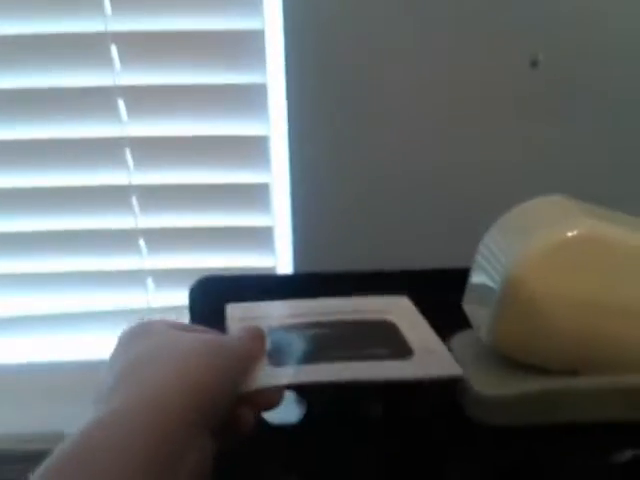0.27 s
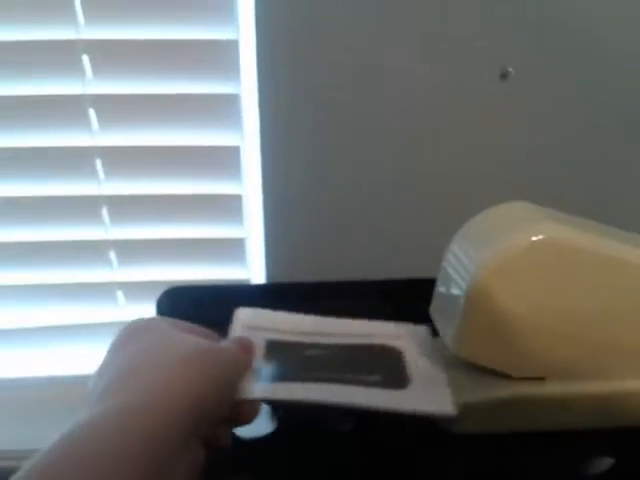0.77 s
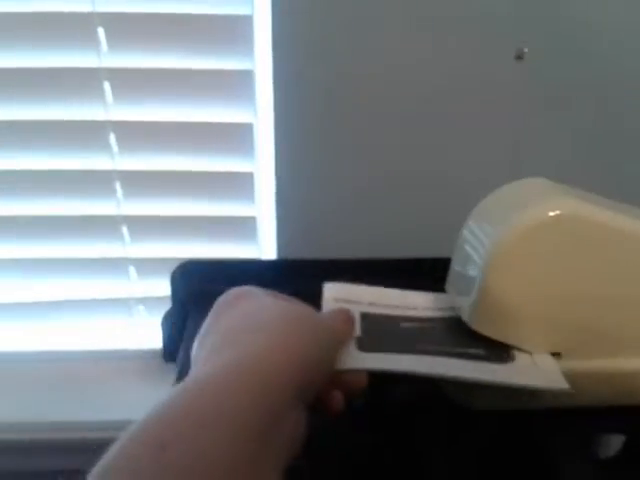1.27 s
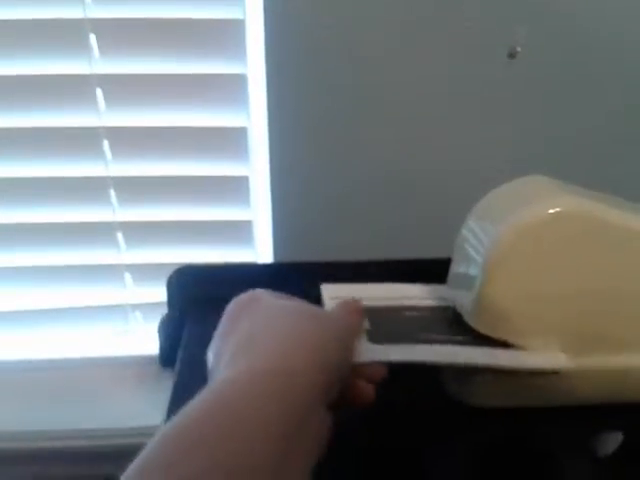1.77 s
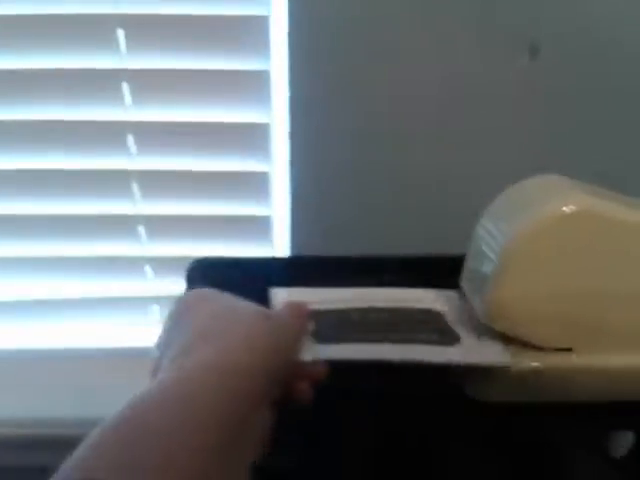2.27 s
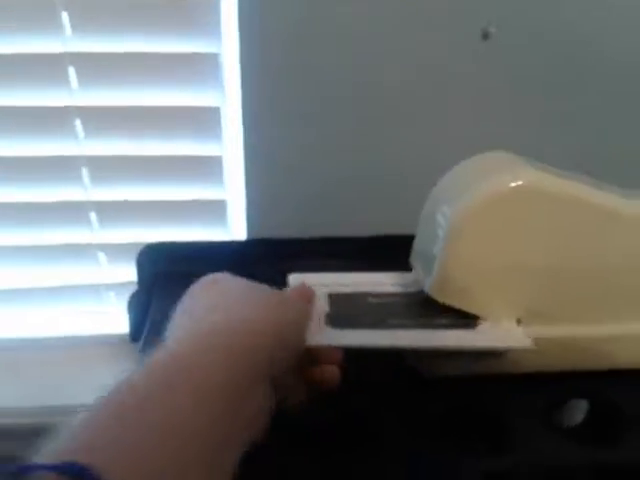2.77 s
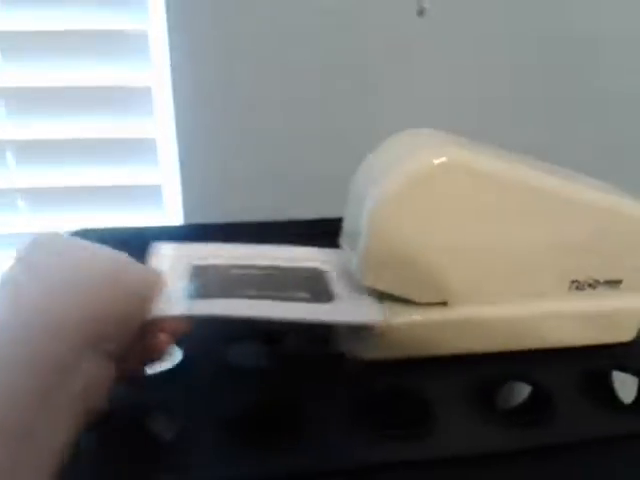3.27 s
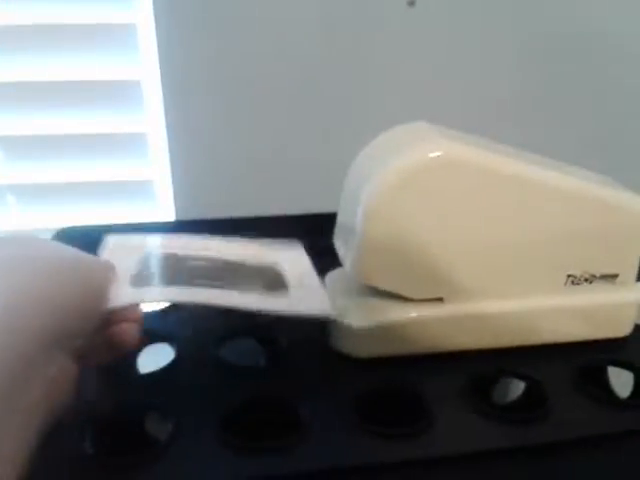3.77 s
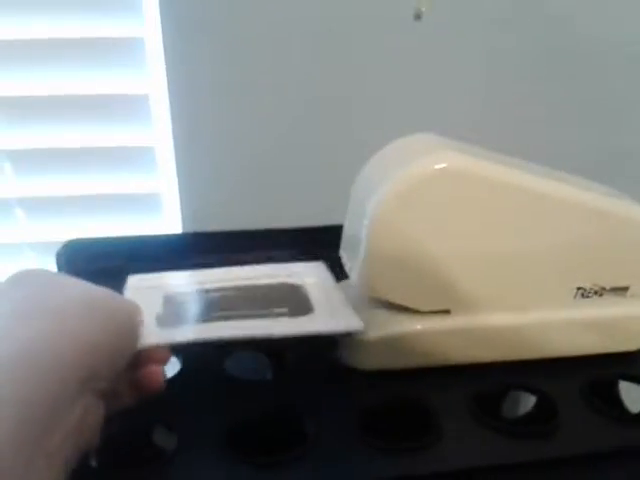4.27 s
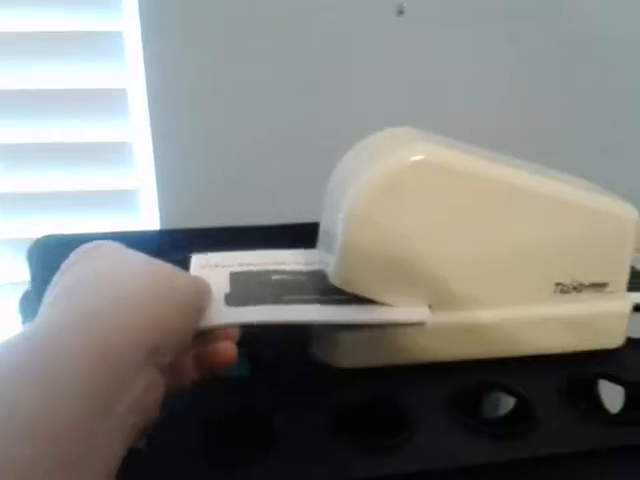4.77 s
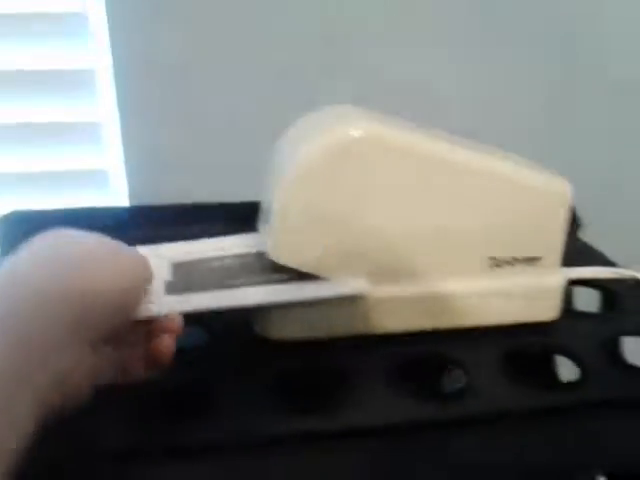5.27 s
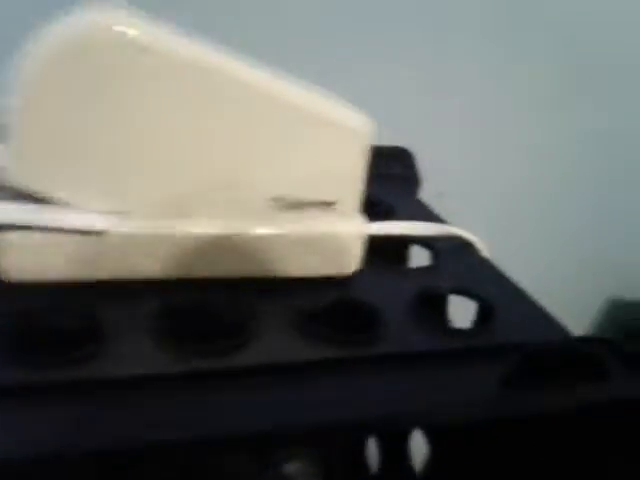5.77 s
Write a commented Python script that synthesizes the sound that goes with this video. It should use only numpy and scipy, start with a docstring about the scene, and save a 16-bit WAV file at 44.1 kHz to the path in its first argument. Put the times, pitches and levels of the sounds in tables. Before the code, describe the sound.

A card taps and slides against a plastic electric stapler, which snaps sharply twice, leaving a brief metal ring in the room.

```python
"""First comes the dying ring of an electric stapler that has just fired, on a plastic cart in a small room.
It fires twice more, each time a fast volley of metal blows that thumps the case on the cart,
sets frame and spring ringing and fills the room. Between firings a card slides in and out of the jaw
and taps against the hollow case. Low rumble and faint hiss lie underneath, and all of it is heard
through a small microphone whose compressor squashes the snaps."""
import sys
import numpy as np
from scipy import signal
from scipy.fft import rfft, irfft
from scipy.io import wavfile
from scipy.ndimage import uniform_filter1d

SR = 44100
rng = np.random.default_rng(int(sys.argv[2]) if len(sys.argv) > 2 else 0)


def pcm_store(signal):
    """Save signal as 16-bit PCM."""
    levels = np.round(np.clip(np.atleast_2d(signal), -1, 1) * 32767)
    wavfile.write(sys.argv[1], SR, levels.astype(np.int16).T)


N = 265041
T = np.arange(N) / SR
RING_T = T[:2 * SR]
LEAD = SR // 4   # samples of scene before time zero

# Stapler firings: start_s, blow_db, hardness_db (on the top treble), thump_db, spring_db, spring_t60_s,
# clinch_delay_s, clinch_db (against the first blow)
FIRINGS = [(-0.132, -5.5, -2.5, -18, -36, 0.95, 0.036, -7.5),
           (1.7821, -5.5, -1, -11.5, -40, 2.0, .027, 1.5), (4.7824, -3, -2, -12.5, -36, 0.9, .011, -1)]
# Tone colour of a metal blow: freq_hz, density_db
BLOW_COLOUR = [(40, -34.5), (130, -23), (350, -9.5), (700, -8), (1050, 3.5), (1650, -5), (2600, -5.5),
               (4000, -3.5), (5300, -4), (6400, 4.5), (7300, 0), (8700, -9.5), (11000, -19.5), (16000, -27)]
# Tone colour of the case thumping on the cart: freq_hz, density_db
THUMP_COLOUR = [(45, -30), (80, -14), (120, -2), (190, -1), (330, -1.5), (550, 1), (1100, 0.5),
                (1800, -16.5)]
# Ringing modes of the metal frame: pitch_hz, level_db, t60_s
FRAME_MODES = [(431, -48, 1.5), (779, -25, .4), (999, -24, .42), (1156, -24, .62), (1345, -27, .5),
               (1470, -41, .9), (1825, -47, 1.0), (2445, -33, .66), (2826, -28, .45), (3029, -35, .65),
               (3635, -47, .9), (4253, -46, .9), (5205, -43, .73), (5863, -35, .75), (6478, -38, .8),
               (6592, -32, .68), (7085, -31, .6), (7790, -32, .6)]
# Clear taps of card on case: start_s, level_db, edge_db (tick over knock),
# crack_db (against the level), knock_pitch_hz
CARD_TAPS = [(0.990, -48.5, -7.5, -6.5, 760), (1.305, -61.5, -3, -3, 800), (1.724, -61.5, -2.5, -7, 1000),
             (2.48, -49, -4, -13, 1120), (2.4963, -55, 18.5, 1.5, 1160), (2.509, -50, -18.5, -7.5, 1010),
             (2.857, -52.5, 17, -17, 1200), (3.630, -41.5, -5, -8.5, 800), (3.780, -63.5, 13, 3, 1400),
             (3.9388, -49, -18.5, -1.5, 678), (4.202, -61, -6, -5.5, 745), (4.27, -63.5, -7.5, 8.5, 1050),
             (4.735, -57.5, 0.5, -6, 1132), (5.325, -63.5, -11, -6, 900), (5.733, -66, -11, 4, 1000),
             (5.796, -55.5, 16.5, -8, 1223), (5.869, -56, 12, -10, 1210), (5.909, -55.5, -2, 3, 1100)]
# Moments when the hand lines the card up: start_s, end_s
FUMBLES = [(1.32, 1.7), (5.74, 6.0)]
# Hollow resonances of the plastic case: pitch_hz, relative_db, t60_s
CASE_MODES = [(240, -10.5, 0.034), (350, 3, 0.063), (590, -5, 0.033), (694, -8, 0.1), (795, -1.5, 0.05),
              (970, 4.5, 0.016), (1160, -0.5, 0.035), (1370, -9, 0.027)]
# Tone colour of the card's crack and scrape: freq_hz, density_db
CRACK_COLOUR = [(800, -22), (1400, 2), (1900, 0.5), (2500, 1.5), (3300, -2), (4800, -6.5), (6500, -31),
                (10000, -49)]
# Tone colour of a bright tick and of the card's hiss: freq_hz, density_db
TICK_COLOUR = [(3000, -24.5), (5200, -8.5), (6300, -2.5), (7100, 0.5), (8600, -18.5), (11000, -27),
               (16000, -20.5)]
# Strokes of the card in the jaw: centre_s, length_s, hiss_db, scrape_db
CARD_SLIDES = [(0.837, 0.15, -73.5, -96), (0.973, .03, -66, -70), (1.66, 0.11, -79, -79),
               (2.392, 0.27, -73.5, -76.5), (2.788, 0.043, -68, -73.5), (4.135, 0.079, -83, -69.5),
               (4.678, 0.13, -77, -77), (5.862, 0.36, -66, -72)]
# Soft low bumps of handling: start_s, pitch_hz, level_db, t60_s
HANDLING_BUMPS = [(5.16, 235.7, -51, 0.22), (5.398, 232, -46, 0.127), (5.485, 474, -41, 0.017)]
# Reverb of the small room, band by band: freq_hz, t60_s, relative_db
ROOM_BANDS = [(60, .4, -12), (150, .48, -8), (350, .52, -3), (900, .48, -2), (2000, .47, -1),
              (4000, .46, -1), (7300, .47, -1), (8800, .36, -2), (16000, .3, -4)]
# Tone colour of the room tone: freq_hz, density_db
ROOM_TONE_COLOUR = [(15, -48.5), (25, -26), (49, -2.5), (127, -4), (212, -8), (516, -12), (659, -16),
                    (887, -18), (1020, -18), (2480, -29), (4030, -33.5), (6920, -32.5), (7710, -40),
                    (13600, -40), (16000, -47)]
# Slow drift of the room tone: time_s, level_db
ROOM_TONE_LEVELS = [(.7, -70), (1.5, -65), (3.1, -68), (4.1, -64), (6.0, -64.5)]


def stapler(blow_decay_s=0.11, thump_decay_s=0.2, trigger_db=-54, trigger_lead_s=.0095):
    """The trigger ticks, then the solenoid slams the driver down and the case thumps on the cart."""
    out = np.zeros(LEAD + N)
    for start_s, db, hardness_db, thump_db, _, _, clinch_s, clinch_db in FIRINGS:
        add(out, start_s - trigger_lead_s, from_db(trigger_db) * tick(hardness_db=0))
        add(out, start_s, from_db(thump_db) * burst(THUMP_COLOUR, thump_decay_s, rise_s=0.0011))
        for delay_s, relative_db in volley(clinch_s, clinch_db):
            blow = burst(hardened(BLOW_COLOUR, hardness_db), blow_decay_s, rise_s=.0008)
            add(out, start_s + delay_s, from_db(db + relative_db) * blow)
    return out


def volley(clinch_s, clinch_db, rebounds=6, gap_s=.013, jitter=.25, rebound_db=-5.5, loss_db=2.14):
    """The driver hits, clinches the staple and rebounds ever more weakly: delay_s, relative_db."""
    k = np.arange(rebounds)
    delays_s = clinch_s + gap_s * (k + 1 + jitter * rng.uniform(-1, 1, rebounds))
    return [(0, 0), (clinch_s, clinch_db), *zip(delays_s, rebound_db - loss_db * k)]


def metal_ring(spring_hz=(914.5, 910), partner_db=-10, spread_db=3):
    """Frame and return spring ring on after a firing, the frame's modes in a new balance each time."""
    out = np.zeros(LEAD + N)
    for start_s, _, _, _, spring_db, spring_t60_s, _, _ in FIRINGS:
        for (hz, db, t60_s), luck in zip(FRAME_MODES, rng.uniform(-1, 1, len(FRAME_MODES))):
            add(out, start_s, np.sign(luck) * mode(hz, db + spread_db * luck, t60_s))
        # the spring's two bending directions beat slowly
        add(out, start_s, mode(spring_hz[0], spring_db, spring_t60_s))
        add(out, start_s, mode(spring_hz[1], spring_db + partner_db, spring_t60_s))
    return out


def card_taps(crack_decay_s=0.031, hardness_db=-8.5, hardness_per_edge=0.57):
    """A tap layers case knock, card crack and tick; edge-on it knocks less and ticks harder."""
    out = np.zeros(LEAD + N)
    for start_s, db, edge_db, crack_db, pitch_hz in CARD_TAPS + faint_touches():
        add(out, start_s, from_db(db - edge_db / 2) * case_knock(pitch_hz))
        add(out, start_s, from_db(db + crack_db) * burst(CRACK_COLOUR, crack_decay_s, rise_s=0.0013))
        add(out, start_s, from_db(db + edge_db / 2) * tick(hardness_db + hardness_per_edge * edge_db))
    return out


def faint_touches(per_s=8, level_db=-69, spread_db=2.5, edge_db=-7, crack_db=-4, pitch_hz=950):
    """The card brushes the case at random while it is lined up; rows as in CARD_TAPS."""
    rows = []
    for start_s, end_s in FUMBLES:
        span_s = end_s - start_s
        for when, luck in rng.random((round(per_s * span_s), 2)):
            db = level_db + spread_db * (2 * luck - 1)
            rows.append((start_s + when * span_s, db, edge_db, crack_db, pitch_hz))
    return rows


def case_knock(centre_hz, spread_octaves=.9):
    """A hollow plastic knock: the place of the touch favours the case modes near one pitch."""
    hz, db, t60_s = np.transpose(CASE_MODES)[:, :, None]
    t = T[:SR // 6]
    strength = from_db(db + rng.uniform(-2.7, 2.4, hz.shape))
    nearness = np.exp(-.5 * (np.log2(hz / centre_hz) / spread_octaves) ** 2)
    polarity = (-1) ** np.arange(len(hz))[:, None]
    modes = strength * nearness * polarity * np.sin(2 * np.pi * hz * t) * fade(t, t60_s)
    return unit_attack(modes.sum(axis=0))


def tick(hardness_db):
    """A bright tick of the card's edge or of a small metal part."""
    return burst(hardened(TICK_COLOUR, hardness_db), decay_s=.035, rise_s=0.00016)


def card_slides(grain_db=3):
    """The card hisses and scrapes as it speeds up and slows down, catching unevenly in the jaw."""
    out = np.zeros(LEAD + N)
    for centre_s, length_s, hiss_db, scrape_db in CARD_SLIDES:
        stroke = np.hanning(int(length_s * SR))
        catch = uniform_filter1d(rng.standard_normal(SR), size=200)
        hiss = from_db(hiss_db) * noise(TICK_COLOUR, SR)
        scrape = from_db(scrape_db) * noise(CRACK_COLOUR, SR)
        rub = (hiss + scrape) * from_db(grain_db * catch / catch.std())
        add(out, centre_s - length_s / 2, stroke * rub[:len(stroke)])
    return out


def handling_bumps():
    """Handling nudges one low resonance at a time, with a soft attack."""
    out = np.zeros(LEAD + N)
    for start_s, hz, db, t60_s in HANDLING_BUMPS:
        add(out, start_s, mode(hz, db, t60_s) * (1 - fade(RING_T, t60_s / 2)))
    return out


def room_reverb(x, predelay_s=0.0018, build_s=0.0012):
    """Diffuse echoes build up after the first wall and die sooner in the top treble."""
    band_hz, band_t60_s, band_db = np.transpose(ROOM_BANDS)
    t = T[:SR]
    white = rfft(rng.standard_normal(SR))
    log_hz = np.log(np.arange(SR // 2 + 1) + 1)
    tail = np.zeros(SR)
    for solo, t60_s, db in zip(np.eye(len(band_hz)), band_t60_s, band_db):
        band = irfft(white * np.interp(log_hz, np.log(band_hz), solo), SR)
        tail += band * fade(t, t60_s) * from_db(db)
    tail *= 1 - np.exp(-np.maximum(t - predelay_s, 0) / build_s)
    return signal.fftconvolve(x, tail / np.linalg.norm(tail))[:len(x)]


def room_tone():
    """A bed of low rumble and faint hiss, drifting gently in level."""
    level_db = np.interp(T, *np.transpose(ROOM_TONE_LEVELS))
    return from_db(level_db) * noise(ROOM_TONE_COLOUR, N)


def burst(spectrum, decay_s, rise_s, size=8192):
    """A struck part whose crowded modes fill its spectrum evenly."""
    t = T[:size]
    attack = 1 - np.exp(-(t / rise_s) ** 2)
    scatter = rfft(rng.standard_normal(size) * attack * fade(t, decay_s))
    coloured = irfft(scatter / np.abs(scatter) * colour(spectrum, size), size)
    # colouring smears the hit, so a second envelope tightens it
    return unit_attack(coloured * attack * fade(t, 2 * decay_s))


def hardened(spectrum, hardness_db, ramp_hz=(6800, 8800)):
    """A harder contact reaches further into the treble: a high shelf on its tone colour."""
    hz, db = np.transpose(spectrum)
    return np.column_stack([hz, db + hardness_db * np.interp(hz, ramp_hz, [0, 1])])


def mode(hz, db, t60_s):
    """One ringing resonance."""
    return from_db(db) * np.sin(2 * np.pi * hz * RING_T) * fade(RING_T, t60_s)


def noise(spectrum, size):
    """Noise of rms 1 with the given tone colour."""
    x = irfft(rfft(rng.standard_normal(size)) * colour(spectrum, size), size)
    return x / x.std()


def colour(spectrum, size):
    """A tone colour as gains per FFT bin, rolling off below its lowest point."""
    hz, db = np.transpose(spectrum)
    bin_hz = np.maximum(np.fft.rfftfreq(size, 1 / SR), 1)
    return from_db(np.interp(np.log(bin_hz), np.log(hz), db)) * np.minimum(bin_hz / hz[0], 1)


def unit_attack(x):
    """Scale a hit to rms 1 over its first 8 ms."""
    return x / np.sqrt(np.mean(x[:SR // 125] ** 2))


def fade(t, t60_s):
    """Free decay: 60 dB down after t60_s."""
    return np.exp(-np.log(1000) * t / t60_s)


def from_db(db):
    """Decibels to amplitude."""
    return 10 ** (np.asarray(db) / 20)


def add(out, start_s, x):
    """Mix x into a track from start_s on."""
    at = max(LEAD + int(round(start_s * SR)), 0)
    out[at:at + len(x)] += x[:max(len(out) - at, 0)]


def scene(reverb_send_db=-8):
    """Stapler and card close up, the room answering, metal ring on top and room tone beneath; mono."""
    close = stapler() + card_taps() + card_slides() + handling_bumps()
    echoes = room_reverb(from_db(reverb_send_db) * close)
    mix = close + echoes + metal_ring()
    return (mix[LEAD:] + room_tone())[None]


def compressor(x, threshold_db=-20, squeeze=0.52, fall_db_per_s=220):
    """The gain ducks at once by a share of the overshoot, then recovers as the held overshoot falls."""
    power = uniform_filter1d(x ** 2, size=180)
    over_db = np.maximum(10 * np.log10(np.maximum(power, 1e-12)) - threshold_db, 0)
    fall_db = fall_db_per_s * T
    held_db = np.maximum.accumulate(over_db + fall_db, axis=-1) - fall_db
    return x * from_db(-squeeze * uniform_filter1d(held_db, size=32))


def record(dry, peak_limit=.68, cutoff_hz=15900):
    """The small microphone's chain squashes the snaps, rounds their peaks and cuts the very top."""
    rounded = peak_limit * np.tanh(compressor(dry) / peak_limit)
    lowpass = signal.ellip(10, .2, 80, cutoff_hz, fs=SR, output="sos")
    return signal.sosfilt(lowpass, rounded)


dry = scene()
out = record(dry)
pcm_store(out)
```